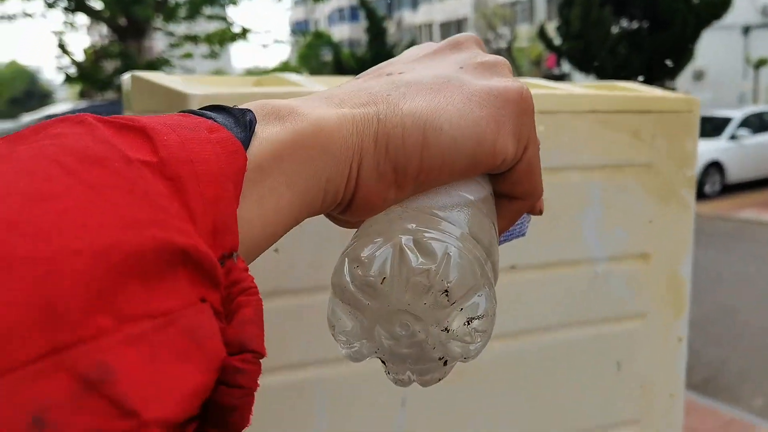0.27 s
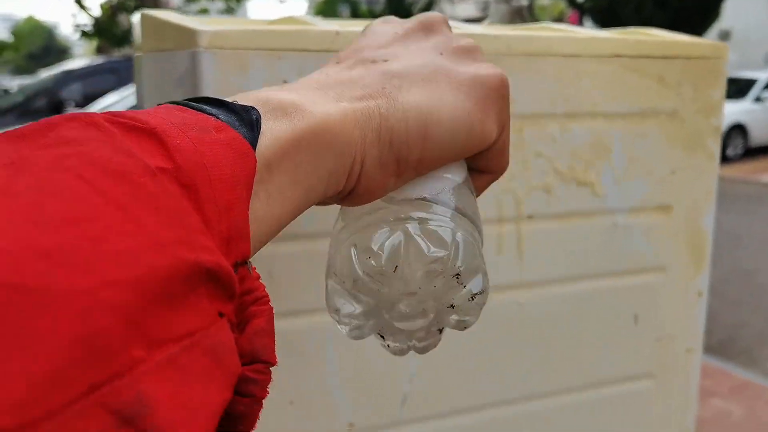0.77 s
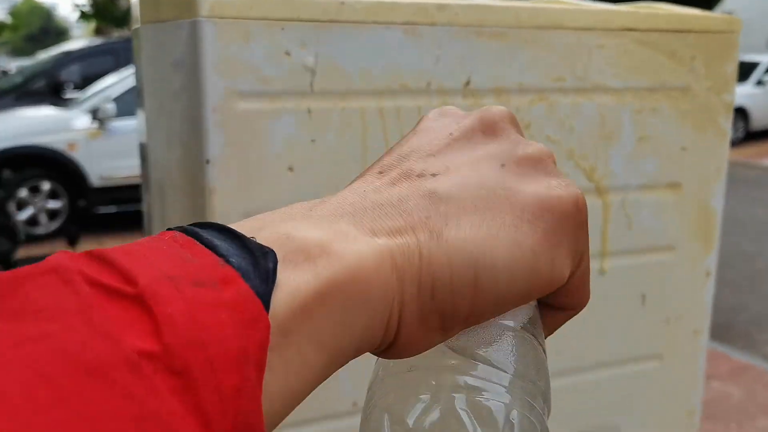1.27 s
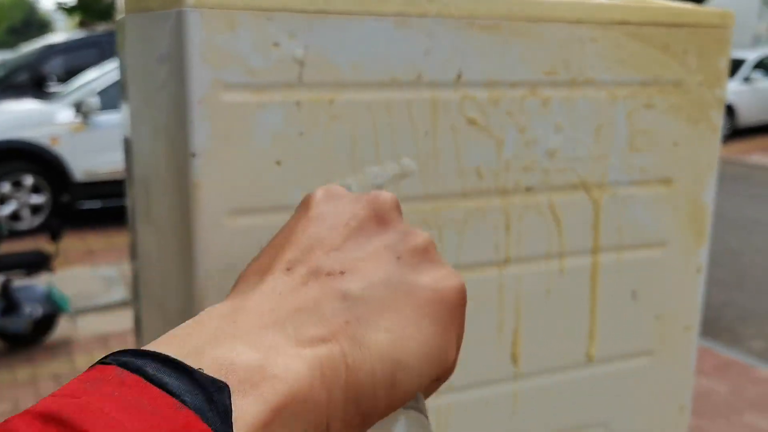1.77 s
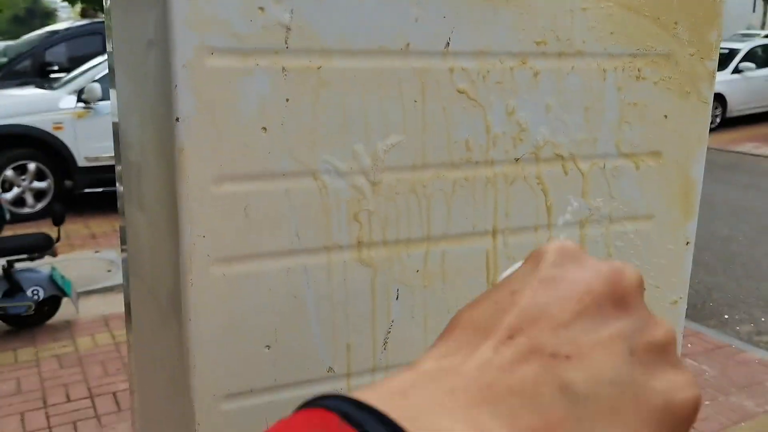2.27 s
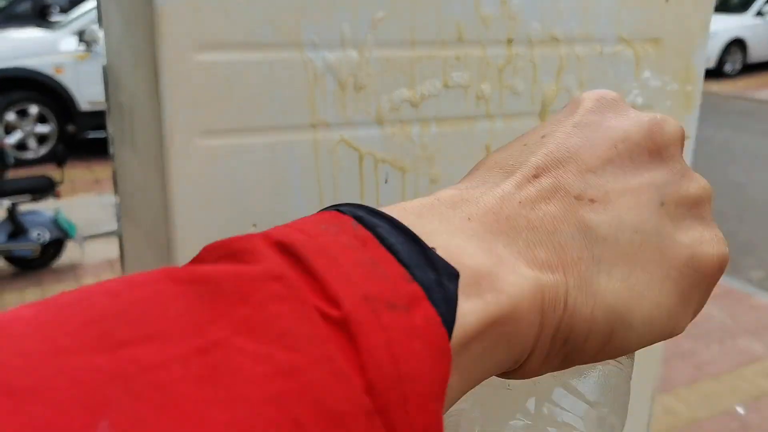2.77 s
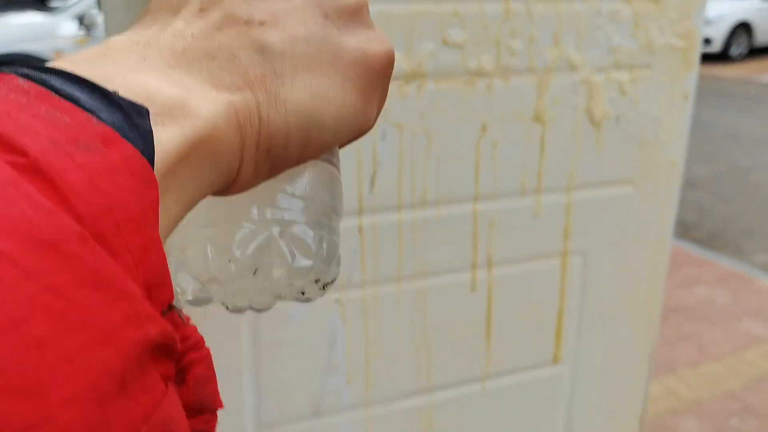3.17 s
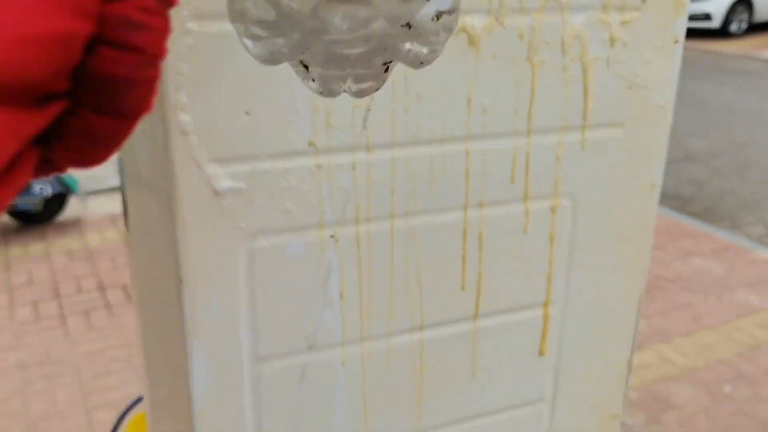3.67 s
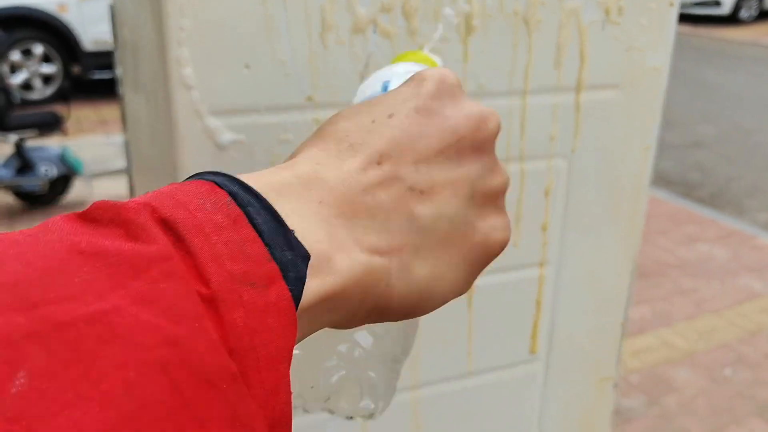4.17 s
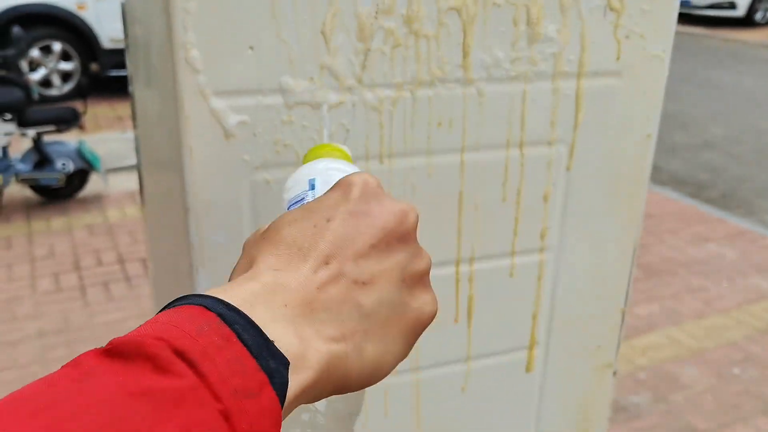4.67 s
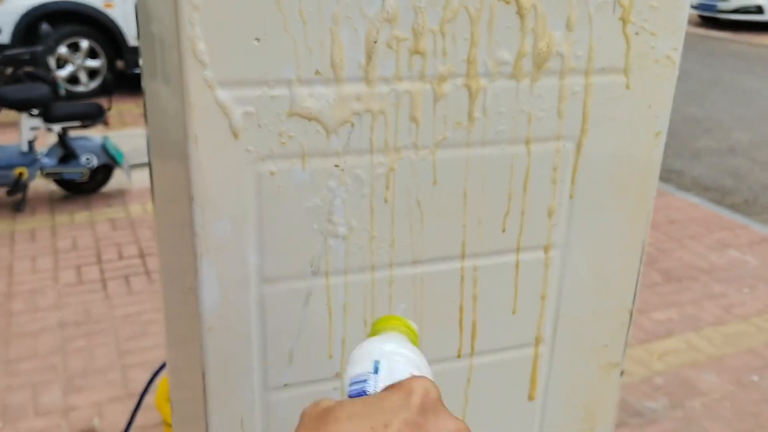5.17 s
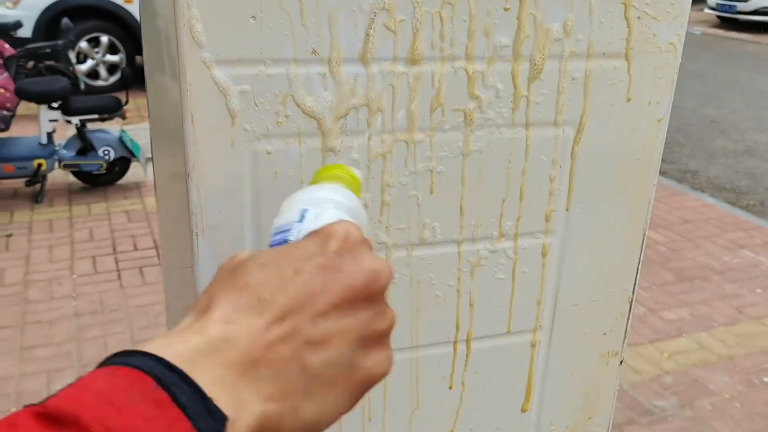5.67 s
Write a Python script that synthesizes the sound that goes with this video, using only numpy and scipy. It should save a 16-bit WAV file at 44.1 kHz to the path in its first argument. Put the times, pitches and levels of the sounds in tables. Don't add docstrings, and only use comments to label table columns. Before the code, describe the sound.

A plastic bottle is squeezed by hand very close to a stereo microphone, outdoors by a quiet street. From 0 to 0.9 s three short, uneven squirts sputter and spit, with hard plastic snaps at about 0.18 s, leaning left, and 0.37 s, leaning right. A gap follows, only low wind, distant traffic and a small dull pop near 1.1 s. From 1.35 s a spray swells to 1.8 s and chokes; another builds from 2.0 to 2.45 s, starting with sharp wet spits. A firm, bright spray runs 2.6 to 2.95 s, then a softer one fades by 3.65 s, with a strong squeaky spit at 3.44 s. A long spray swells from 3.75 to 4.7 s, and the last runs from 4.8 s to the end. The hiss shifts colour as its short echo off the panel moves. Light pops, wind flutters and a faint motor whine recur.

```python
import sys
import numpy as np
from scipy import signal
from scipy.fft import rfft, irfft, next_fast_len
from scipy.io import wavfile
from scipy.ndimage import uniform_filter1d, map_coordinates

SR = 44100
rng = np.random.default_rng(int(sys.argv[2]) if len(sys.argv) > 2 else 0)


def materialize(psi):
    bounded = np.clip(np.atleast_2d(psi).T, -1, 1)
    quanta = np.round(bounded * 32767).astype(np.int16)
    wavfile.write(sys.argv[1], SR, quanta)


def ratio_of_db(decibels):
    return 10 ** (np.asarray(decibels, float) / 20)


N = 260631

# [t/s, hiss level/dB]
FUMBLES = [
    [(0.0, -40.5), (0.125, -43.5), (0.14, -47.5), (0.174, -46), (0.21, -59), (0.226, -61)],
    [(0.236, -52), (0.266, -56), (0.306, -45.5), (0.38, -42.5), (0.46, -44), (0.478, -58), (0.51, -51),
     (0.55, -55), (0.57, -71.5)],
    [(0.632, -74), (0.644, -48), (0.702, -38), (0.758, -51), (0.776, -49), (0.805, -42.5), (0.82, -64),
     (0.9, -105)],
]
# [t/s, hiss level/dB]
SPRAYS = [
    [(1.32, -105), (1.34, -60), (1.395, -54), (1.445, -35.5), (1.668, -38), (1.778, -31.5), (1.814, -40.5),
     (1.85, -62), (1.965, -77)],
    [(1.976, -71), (2.006, -43.5), (2.055, -51), (2.1, -37.5), (2.3, -33.5), (2.42, -29.5), (2.46, -53),
     (2.585, -79)],
    [(2.606, -44), (2.636, -29.5), (2.666, -34), (2.848, -34.5), (2.926, -32.5), (2.978, -53), (3.018, -59)],
    [(3.032, -38.5), (3.07, -36.5), (3.226, -39), (3.29, -36), (3.396, -40), (3.518, -48), (3.564, -43),
     (3.682, -57.5), (3.692, -60)],
    [(3.704, -58), (3.84, -42), (3.916, -36), (4.234, -32), (4.54, -40), (4.66, -36.5), (4.7, -35.5),
     (4.734, -59), (4.785, -62)],
    [(4.808, -53.5), (4.914, -35.5), (5.044, -30.5), (5.094, -36.5), (5.18, -32), (5.504, -35),
     (5.712, -37), (5.816, -40.5), (5.91, -36)],
]
# [middle t/s, extra low splash level/dB, extra top fizz level/dB]
GRIPS = [(.05, 1, 2.5), (.4, 5.5, 3), (.72, 0.5, -0.5), (1.5, 1, -4), (1.75, 2, 0), (2.1, 1.5, 4.5),
         (2.4, -1.5, -4.5), (2.75, -3.5, -3), (3.15, 1.5, 0), (3.55, 7, -7), (3.78, 11, -2.5),
         (3.95, -4.5, -1.5), (4.2, -1, -1), (4.55, 0.5, -2), (5.1, -10, -2.5), (5.35, 2.5, 0),
         (5.7, -3, -1.5)]
# [far turn t/s, echo delay/ms, near turn t/s, echo delay/ms]
STROKES = [(.4, 0.39, 0.72, 0.39), (1.5, 0.6, 1.99, 0.19), (2.18, 0.73, 2.43, 0.39),
           (2.75, 0.73, 3.06, 0.36), (3.05, 0.38, 3.44, 0.39), (3.7, 0.865, 4.08, 0.44),
           (4.03, 1, 3.83, 0.52), (4.45, 0.86, 4.62, 0.48), (4.8, 0.82, 5.7, 0.51), (5.2, .74, 5.4, .56),
           (5.57, .82, 5.63, 0.4)]
# [t/s, peak level/dB, squeak f/Hz]
SPITS = [(0.151, -26, 4200), (0.231, -34, 4370), (0.252, -29, 13500), (0.2952, -25, 10800),
         (0.495, -24, 10440), (0.5396, -25, 6160), (0.6433, -35, 10000), (0.665, -29, 8160),
         (0.743, -34, 6340), (0.7787, -23.5, 8100), (1.3462, -40.5, 6900), (1.38, -34, 6900),
         (1.823, -23.5, 8550), (1.9902, -26, 8300), (2.003, -17, 7960), (2.03, -24, 7470),
         (2.0645, -23, 11000), (2.087, -30, 7600), (2.9575, -21.5, 5000), (2.966, -26, 5140),
         (2.9826, -29.5, 7400), (3.029, -29, 5540), (3.4396, -15.5, 3860), (3.4686, -22, 5240),
         (3.5848, -30, 6100), (3.728, -32, 6550), (3.773, -29.5, 4150), (4.8053, -32, 7090),
         (4.818, -28, 7200), (4.858, -32, 7200)]
# [f/Hz, level/dB per Hz]
JET_LEFT = [(1200, -29.5), (2000, -19), (3000, -7), (4200, -4.5), (5500, -4), (6400, 0.5), (7500, 5),
            (8300, -2.5), (9300, -14), (10200, -13), (11200, -1.5), (12300, -13.5), (13800, -2),
            (15200, -0.5)]
# [f/Hz, level/dB per Hz]
JET_RIGHT = [(1200, -30), (2000, -17), (3000, -7), (4200, -6.5), (5500, -7), (6400, -1), (7500, -1.5),
             (8300, -16), (9300, -6.5), (10200, -2.5), (11200, 1.5), (12300, -3.5), (13800, -5),
             (15200, -2)]
# [f/Hz, phase/rad]
JET_PHASE = [(300, -1), (1000, -2.6), (1700, -3.1), (2400, -4.4), (3800, -6), (5800, -7.7), (7000, -6.7),
             (8300, -4.9), (9300, -5.6), (10200, -5.3), (11000, -6.6), (12500, -4.5), (13800, -6.2)]
# [t/s, peak level/dB, left-right level/dB, extra path to the right/ms]
SNAPS = [
    (.1760, -11, 5, 0.2),
    (0.3688, -12, -7, 0.042),
]
# [t/ms, level/dB]
SNAP_CRACKS = [
    [(-2, -26), (0, 0), (1.02, -4), (2.1, -7), (3.8, -17)],
    [(-1.3, -18), (0, 0), (.95, -13), (2.3, -13), (3.6, -22)],
]
# [f/Hz, level/dB, t60/s]
SNAP_MODES = [
    [(1500, -19, .015), (3300, -11, .005), (4370, -1, .009), (5400, -4, .005), (7000, -4, .004)],
    [(1100, -15, .015), (2250, -7, .009), (3000, -1, .003), (4100, -4, .004), (5900, -10, .003)],
]
# [t/s, peak level/dB, low mode f/Hz, high mode f/Hz, high mode level/dB, t60/s]
POPS = [(.186, -33, 4300, 6200, -2, .008), (.828, -36, 760, 1100, -6, .035),
        (.829, -40, 290, 5000, -8, .03), (1.096, -34, 500, 2250, -5, .03),
        (1.097, -35, 1500, 2600, 2, .012), (2.189, -30, 1150, 1500, 0, .018),
        (2.248, -42, 1050, 1550, 0, .015), (2.375, -45, 850, 1100, -3, .02),
        (3.824, -33, 1200, 2100, 0, .015), (3.845, -28, 3200, 3500, -4, .015),
        (4.025, -33, 1000, 1650, 3, .015), (4.81, -36, 2300, 3200, 0, .01)]
# [t/s, peak level/dB, half length/s, left-right level/dB, extra deep share level/dB]
GUSTS = [(0.04, -61, 0.042, -15.5, 9), (0.197, -47, 0.13, 5, 3), (0.465, -57, 0.051, 5, 23),
         (0.85, -53, 0.074, 12, -2), (1.71, -50, 0.14, 0.5, 5), (1.945, -42, 0.11, 1.5, 4),
         (2.301, -48, 0.15, 1, 4), (2.705, -46.5, .05, 0.5, 13), (2.87, -53.5, 0.056, 0, -4),
         (3.05, -50.5, 0.025, 12, 2), (3.236, -50, 0.033, 7, -9), (3.7, -45.5, 0.021, 11, 4),
         (3.77, -50.5, 0.055, 8, 15), (3.841, -42.5, .05, 5, 14.5), (4.015, -52, 0.022, 4, -10),
         (4.33, -47.5, 0.045, 1.5, -3), (4.509, -45, 0.022, 13, 3), (4.945, -52, 0.015, 0, -20),
         (5.186, -41, 0.054, 9.5, -4), (5.35, -51, 0.1, 2, -7), (5.639, -46.5, 0.044, 10.5, -5),
         (5.864, -50.5, 0.093, 3.5, -1)]
# [f/Hz, level/dB per Hz]
WIND_COLOUR = [(12, -43), (20, -16.5), (38, 3), (81, -5), (129, 4), (161, -4), (277, -5), (698, -32.5),
               (900, -34), (1170, -27), (1980, -120)]
# [f/Hz, level/dB per Hz]
STREET_COLOUR = [(120, -57), (200, -20.5), (310, -13.5), (345, -14.5), (564, -12.5), (728, -14), (812, -13),
                 (1620, -12), (2130, -10.5), (2380, -4), (2700, -12), (3120, -11), (7500, -26.5),
                 (9500, -39), (15500, -43)]
# [f/Hz, phase/rad]
STREET_PHASE = [(700, .1), (1050, 2.8), (1700, 3.7), (3000, 4)]
# [t/s, peak level/dB, half length/s]
WHINE = [
    (.6, -68, 0.16),
    (2.1, -72, .6),
    (4.3, -65.5, 0.55),
    (5.3, -66.5, 0.22),
]


def in_time(rows):
    s, *columns = np.transpose(rows)
    return [np.interp(np.arange(N) / SR, s, c) for c in columns]


def swells(rows):
    s, db, half = np.transpose(rows)[:3, :, None]
    return ratio_of_db(2 * db) * np.exp(-((np.arange(N) / SR - s) / half) ** 2)


def rms_one(x):
    return x / np.sqrt(np.mean(x ** 2) + 1e-20)


def drift(rate_hz):
    r = np.exp(-2 * np.pi * rate_hz / SR)
    wander = signal.lfilter([1], [1, -2 * r, r * r], rng.standard_normal(N + SR))
    return rms_one(wander[SR:])


def colour(x, spectrum, lead=((1, 0),)):
    size = next_fast_len(N + 4096)
    axis = np.log(np.arange(size // 2 + 1) * SR / size + 1)

    def outline(rows):
        hz, value = np.transpose(rows)
        return np.interp(axis, np.log(hz), value)

    response = ratio_of_db(outline(spectrum)) * np.exp(-1j * outline(lead))
    return irfft(rfft(x, size) * response, size)[..., :N]


def cut(x, hz, kind):
    return signal.sosfilt(signal.butter(4, hz, kind, fs=SR, output="sos"), x)


def delayed(x, ms):
    return map_coordinates(x, [np.arange(N) - ms * SR / 1000], order=3)


def ring(clicks, hz, t60):
    r, w = ratio_of_db(-60 / (t60 * SR)), 2 * np.pi * hz / SR
    return signal.lfilter([0, np.sin(w)], [1, -2 * r * np.cos(w), r * r], clicks + 1e-18)


def ports(x, lag_ms, pan_db):
    return np.array([x * ratio_of_db(pan_db / 2), delayed(x, lag_ms) * ratio_of_db(-pan_db / 2)])


def jet(echo_db, scatter_db, flicker_db, sputter_db):
    hiss_db, = in_time(sorted(tuple(row) for table in FUMBLES + SPRAYS for row in table))
    splash_db, fizz_db = in_time(GRIPS)
    firm_db = -34
    low_db = np.minimum(-11.5 - 0.6249 * (hiss_db - firm_db), -9.5)
    low_db = low_db + splash_db - 0.3 * np.clip(hiss_db + 49.5, -20, 0)
    top_db = -1.5 + fizz_db + 0.1 * np.minimum(hiss_db + 49.5, 0)

    weak = np.clip((-36.5 - hiss_db) / 9, 0, 1)
    puffs, squeaks = spits(tone_db=-8)
    flow = ratio_of_db(hiss_db + (flicker_db + sputter_db * weak) * drift(24.6) - 2.06 * weak)
    white = rng.standard_normal((3, N)) * ratio_of_db(1.4 * drift(540))
    spitting = flow + puffs
    splash = cut(white, 3320, "low") * flow * ratio_of_db(low_db + 10.0 + 3.4 * drift(5.1))
    body = cut(white, [3800, 5600], "band") * spitting * ratio_of_db(2.2 * drift(9.2))
    hiss = cut(white, [5600, 9000], "band") * spitting * ratio_of_db(1.27 * drift(12.8))
    fizz = cut(white, 7650, "high") * spitting * ratio_of_db(top_db + 2.04 + 1.2 * drift(4.0))
    shared, *own = splash + body + hiss + fizz

    echo_ms = uniform_filter1d(in_time(np.reshape(STROKES, (-1, 2)))[0], size=SR // 10)
    lag_ms = 0.66 - 0.25 * echo_ms - 0.17 * np.clip(1 - np.arange(N) / SR, 0, 1)
    direct = ports(shared + squeaks, lag_ms, 0) + ratio_of_db(scatter_db) * np.array(own)
    left, right = [side + ratio_of_db(echo_db) * delayed(cut(side, 9000, "low"), echo_ms - .045) for side in direct]
    return ratio_of_db(7.0) * np.array([colour(left, JET_LEFT), colour(right, JET_RIGHT, JET_PHASE)])


def spits(tone_db):
    puffs, squeaks = np.zeros(N), np.zeros(N)
    rise_ms = 0.91
    u = np.arange(SR // 16) * 1000 / SR / rise_ms
    for s, db, hz in SPITS:
        at = round(s * SR)
        puff = ratio_of_db(db - 18.0) * u * np.exp(1 - u)
        noise = rng.standard_normal(len(u))
        puffs[at:at + len(u)] += puff
        squeaks[at:at + len(u)] += ratio_of_db(tone_db) * ring(puff * noise, hz, 0.015)
    return puffs, squeaks


def bottle():
    return snaps() + ports(pops(), 0.14, -1.9)


def snaps():
    out = np.zeros((2, N))
    for (s, db, pan_db, lag_ms), cracks, modes in zip(SNAPS, SNAP_CRACKS, SNAP_MODES):
        ticks = np.zeros(N)
        for ms, crack_db in cracks:
            ticks[round((s + ms / 1000) * SR)] = ratio_of_db(db + crack_db)
        wall = sum(ratio_of_db(mode_db) * ring(ticks, hz, t60) for hz, mode_db, t60 in modes)
        lowest_hz = modes[0][0]
        out += ports(cut(wall, [0.86 * lowest_hz, 8200], "band"), lag_ms, pan_db)
    return out


def pops():
    out = np.zeros(N)
    for s, db, low_hz, high_hz, high_db, t60 in POPS:
        tick, at = np.zeros(SR // 10), round(s * SR)
        tick[:3] = ratio_of_db(db) * np.hanning(5)[1:-1] / 2
        tick = cut(tick, .65 * low_hz, "high")
        modes = ring(tick, low_hz, t60) + ratio_of_db(high_db) * ring(tick, high_hz, 1.54 * t60)
        out[at:at + len(tick)] += modes
    return out


def wind(lumpy_db):
    gusts, breeze = swells(GUSTS), ratio_of_db(2 * -55)
    gust_pan_db, gust_deep_db = np.array(GUSTS)[:, 3:5].T
    power = breeze + gusts.sum(axis=0)
    level_db = 10 * np.log10(power)
    pan_db = (0.5 * breeze + gust_pan_db @ gusts) / power
    deep_db = -7.5 - 0.56 * (level_db + 52) + gust_deep_db @ gusts / power
    sides_db = level_db + 2.0 + pan_db * np.array([[.5], [-.5]])
    noise = rms_one(colour(rng.standard_normal((2, N)), WIND_COLOUR))
    deep = ratio_of_db(deep_db + 7.0) * cut(noise, [42, 90], "band")
    middle = cut(noise, [90, 200], "band")
    flutter = ratio_of_db(0.69 * (sides_db + 42.5)) * cut(noise, 223.5, "high")
    lumps = ratio_of_db(sides_db + lumpy_db * np.array([drift(25.0), drift(21)]))
    return lumps * (deep + middle + flutter)


def street(alike_db):
    shared, *own = rng.standard_normal((3, N))
    shared = ratio_of_db(alike_db) * cut(shared, 1870, "low")
    left = colour(shared + own[0], STREET_COLOUR)
    right = colour(shared + own[1], STREET_COLOUR, STREET_PHASE)
    wash = ratio_of_db(-54.5 + 2.95 * drift(1.83)) * rms_one(np.array([left, right]))
    return wash + motor_whine()


def motor_whine():
    tone = np.sin(2 * np.pi * 1299 * np.arange(N) / SR + drift(4))
    level = np.sqrt(swells(WHINE).sum(axis=0)) * ratio_of_db(3.7 * drift(52))
    return level * tone * ratio_of_db(np.array([[-2], [2]]))


def scene():
    panel_db = np.interp(np.arange(N) / SR, [1, 1.3], [-15, -7.5])
    spray = jet(panel_db, scatter_db=2.7, flicker_db=0.81, sputter_db=2.6)
    return spray + bottle() + wind(lumpy_db=3.5) + street(alike_db=-1.0)


def roll_off(x):
    return signal.sosfilt(signal.butter(12, 16790, fs=SR, output="sos"), x)


def record(dry):
    top = signal.cheby2(14, 45, 16000, fs=SR, output="sos")
    mix = signal.sosfilt(top, dry)
    return roll_off(mix)


dry = scene()
out = record(dry)
materialize(out)
```